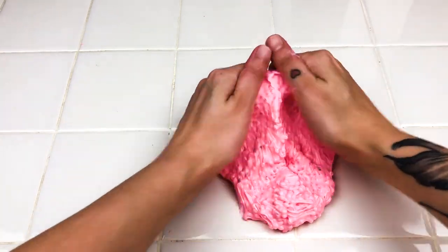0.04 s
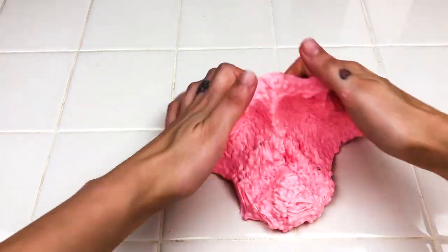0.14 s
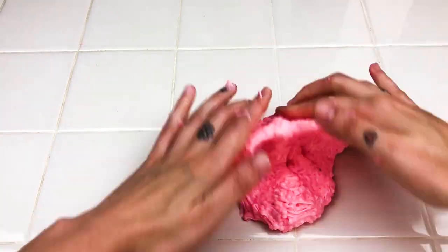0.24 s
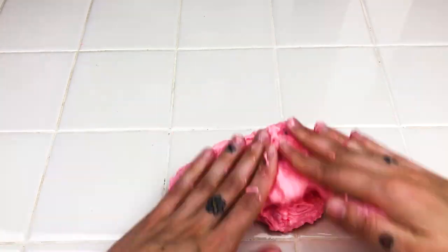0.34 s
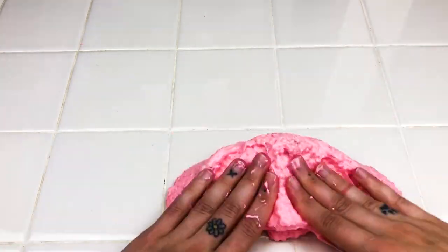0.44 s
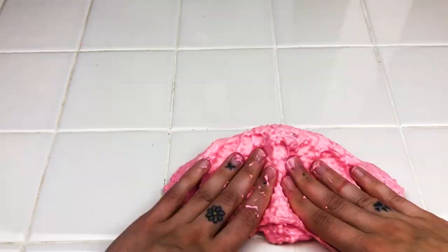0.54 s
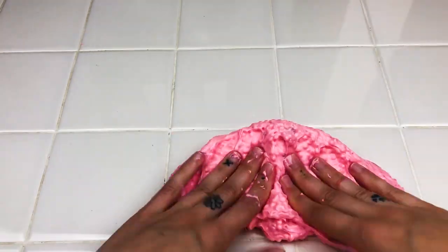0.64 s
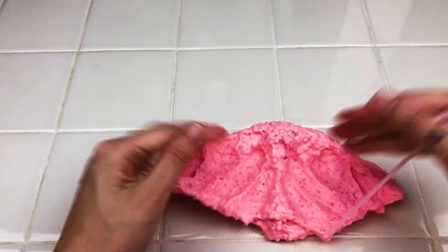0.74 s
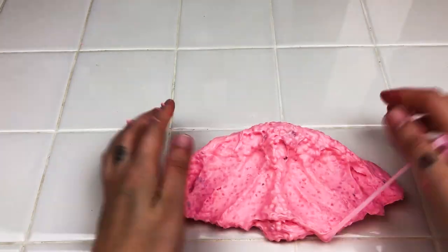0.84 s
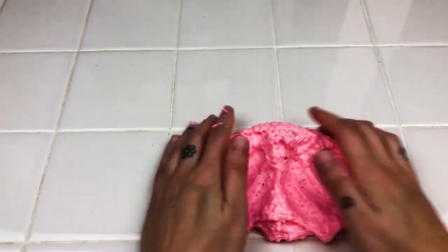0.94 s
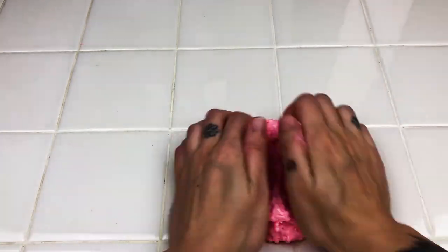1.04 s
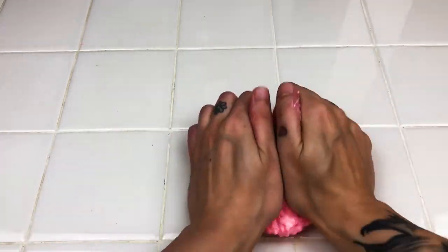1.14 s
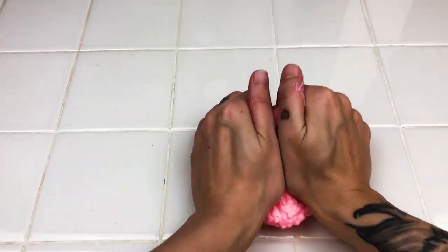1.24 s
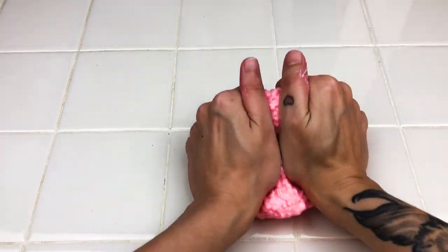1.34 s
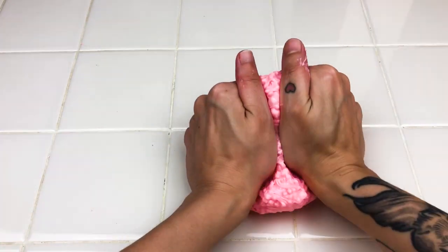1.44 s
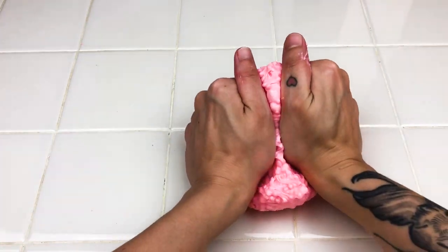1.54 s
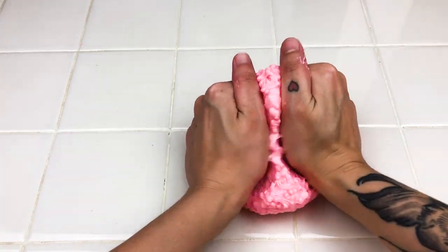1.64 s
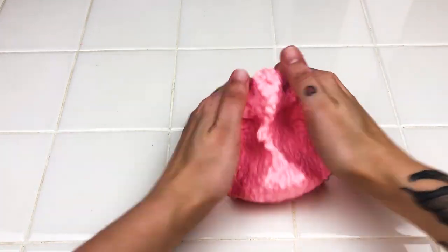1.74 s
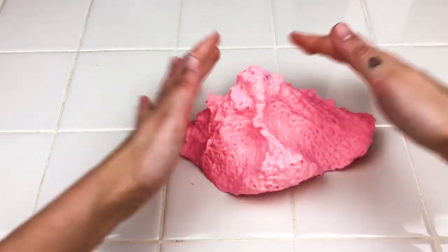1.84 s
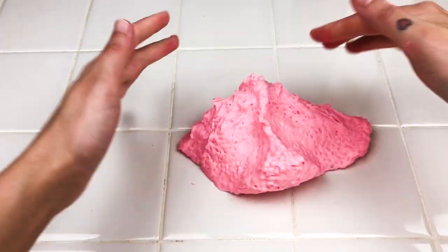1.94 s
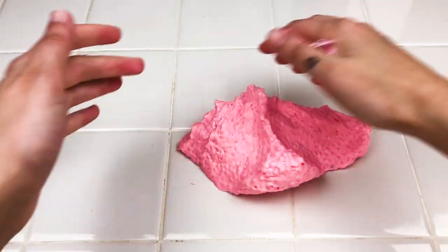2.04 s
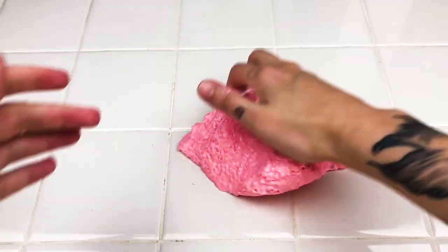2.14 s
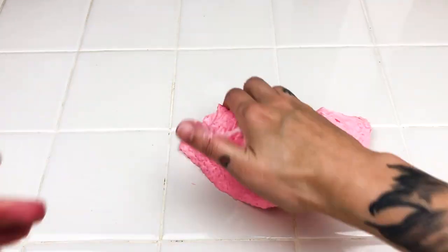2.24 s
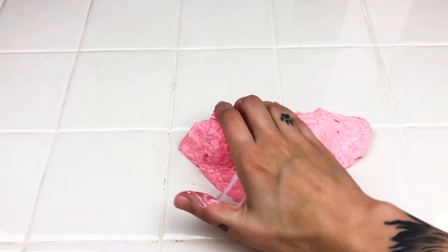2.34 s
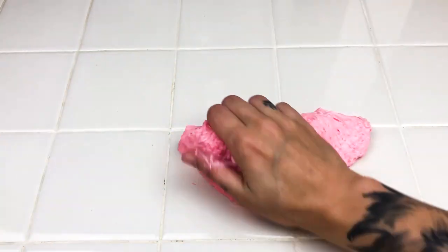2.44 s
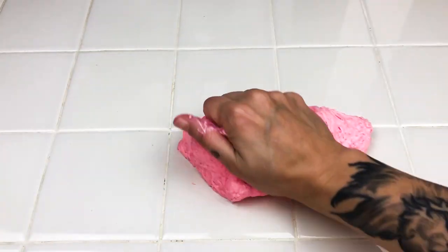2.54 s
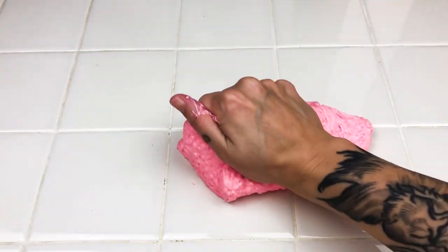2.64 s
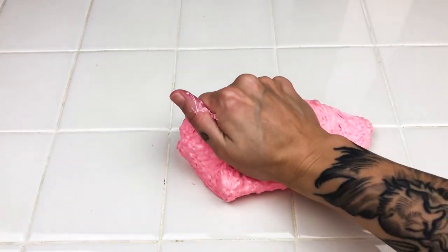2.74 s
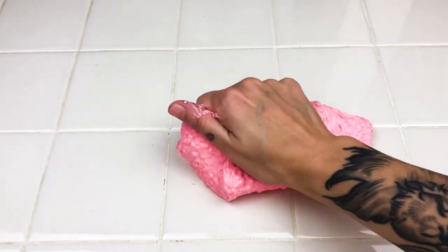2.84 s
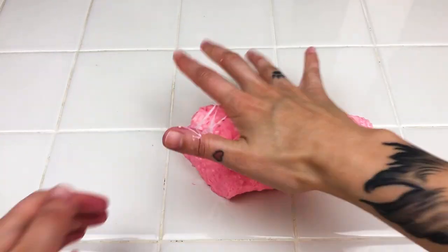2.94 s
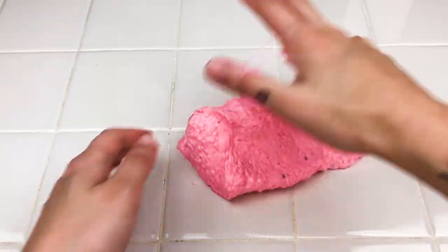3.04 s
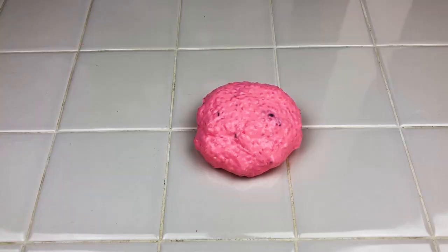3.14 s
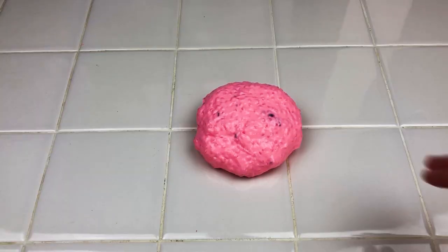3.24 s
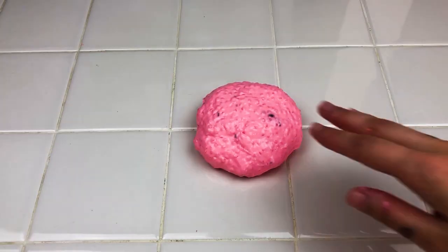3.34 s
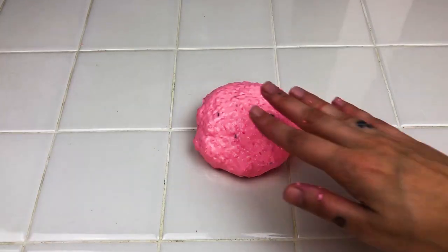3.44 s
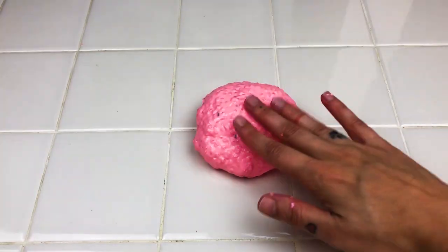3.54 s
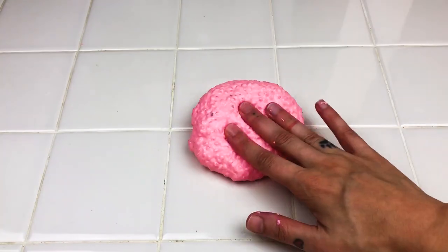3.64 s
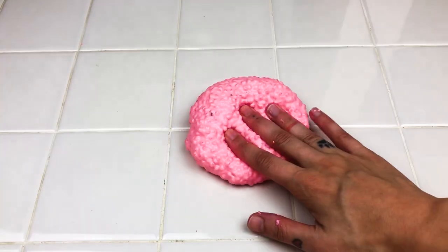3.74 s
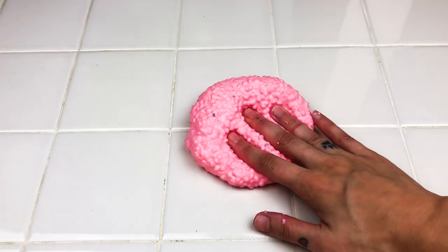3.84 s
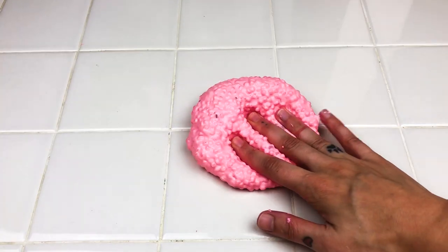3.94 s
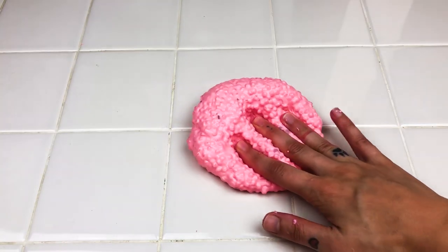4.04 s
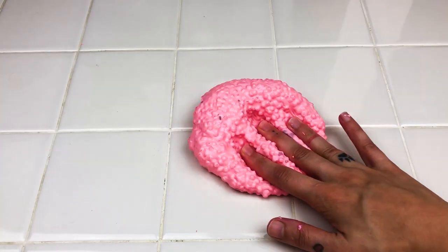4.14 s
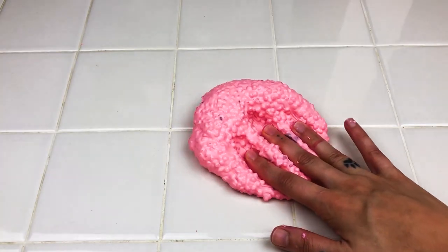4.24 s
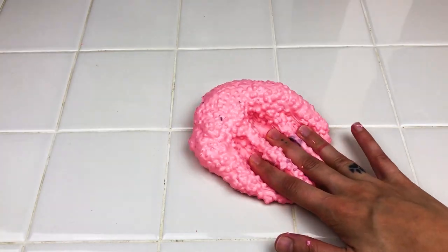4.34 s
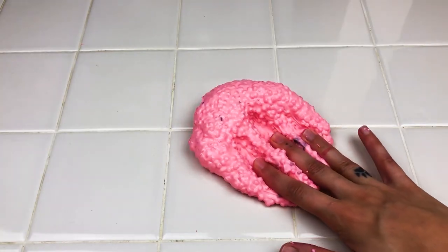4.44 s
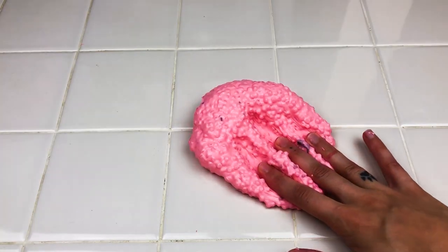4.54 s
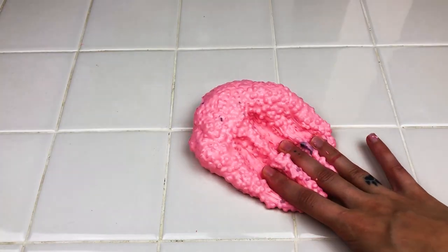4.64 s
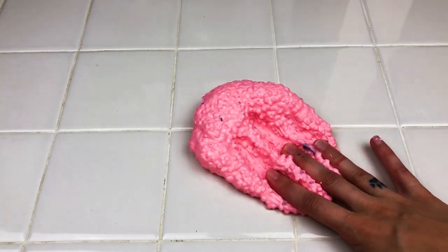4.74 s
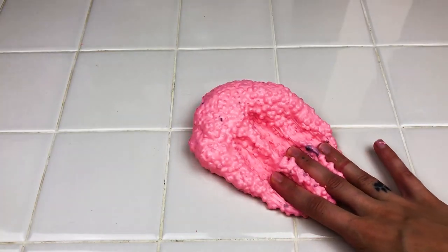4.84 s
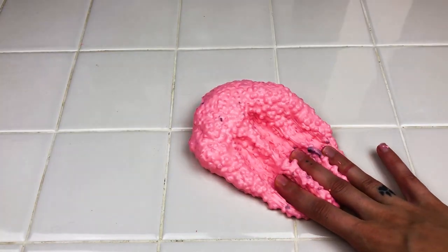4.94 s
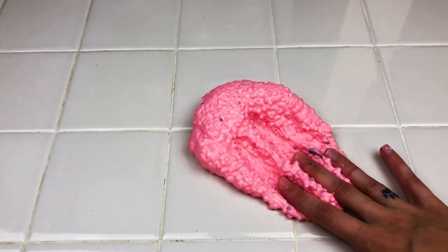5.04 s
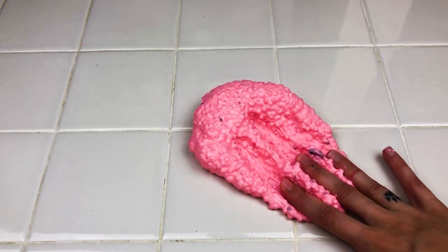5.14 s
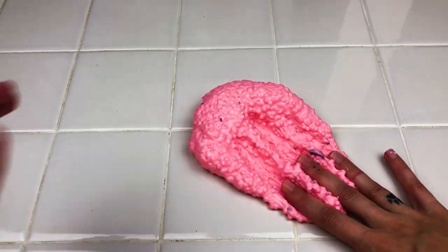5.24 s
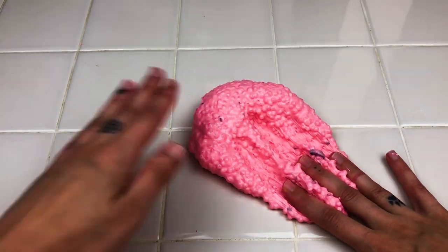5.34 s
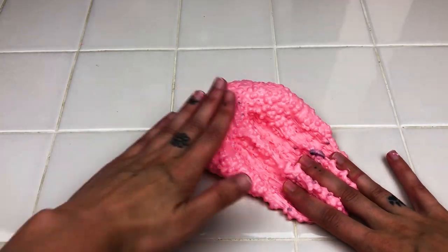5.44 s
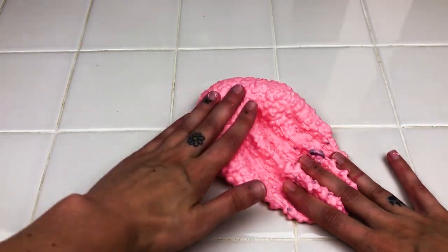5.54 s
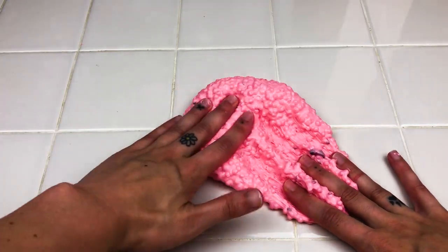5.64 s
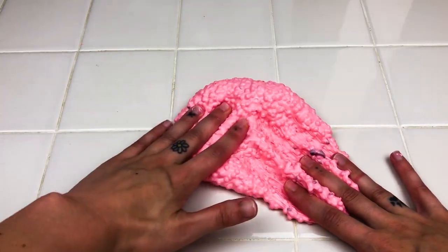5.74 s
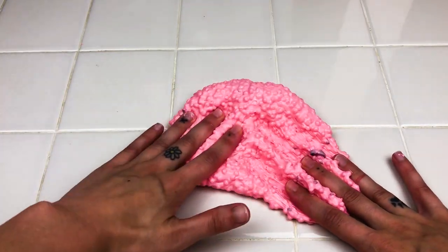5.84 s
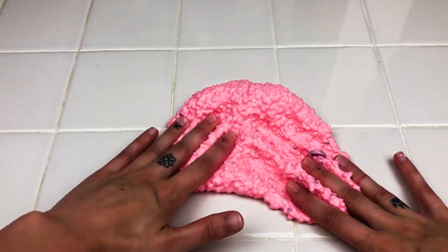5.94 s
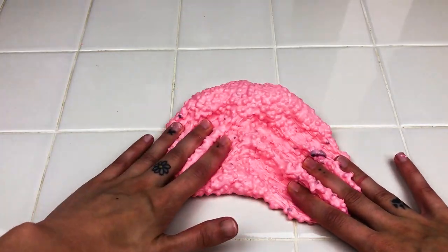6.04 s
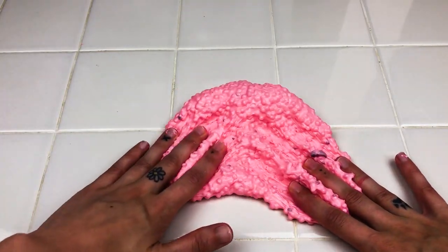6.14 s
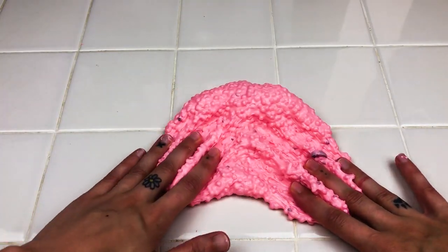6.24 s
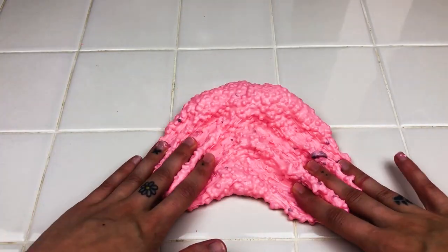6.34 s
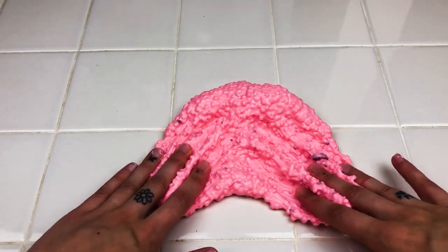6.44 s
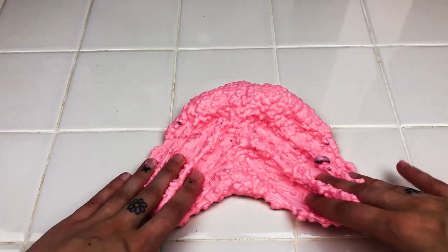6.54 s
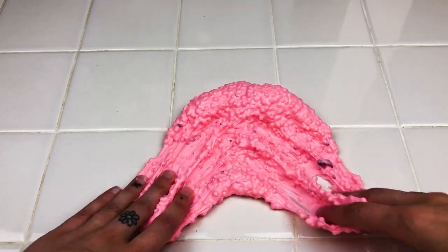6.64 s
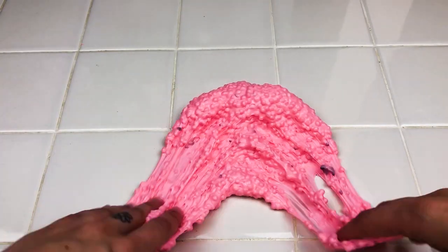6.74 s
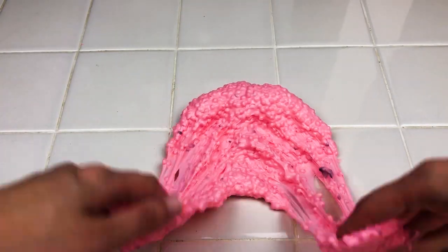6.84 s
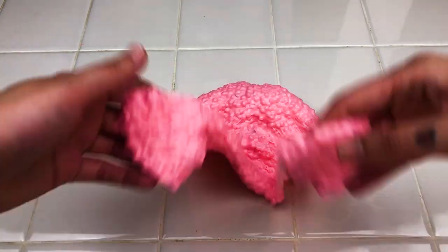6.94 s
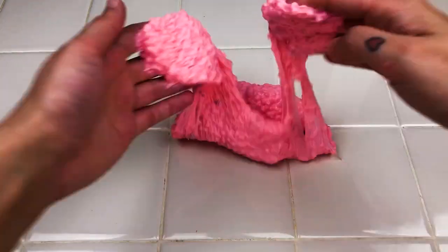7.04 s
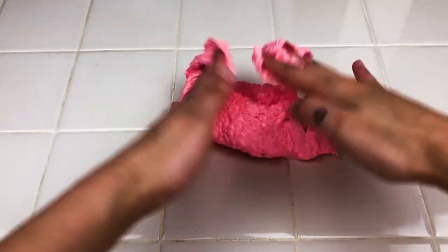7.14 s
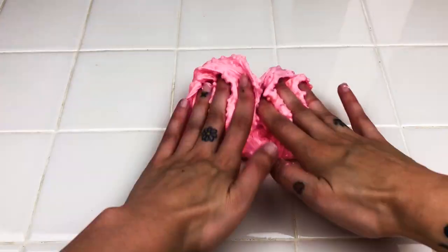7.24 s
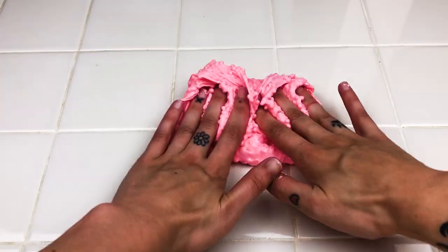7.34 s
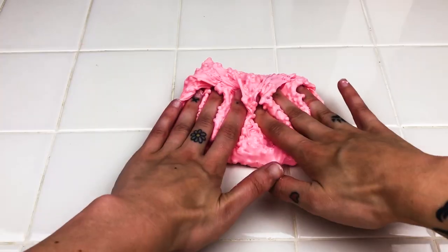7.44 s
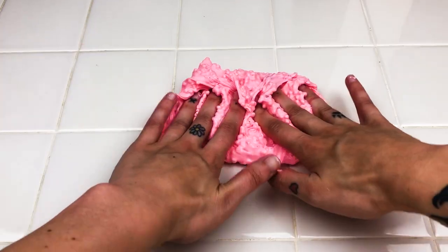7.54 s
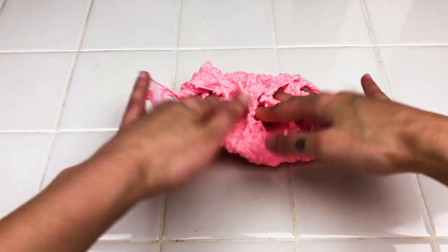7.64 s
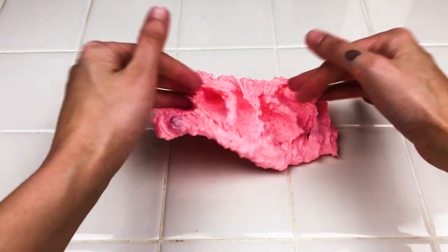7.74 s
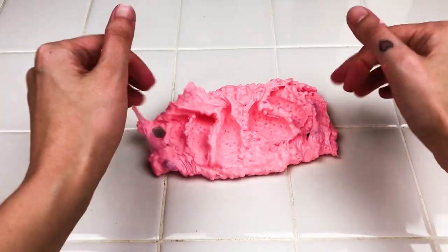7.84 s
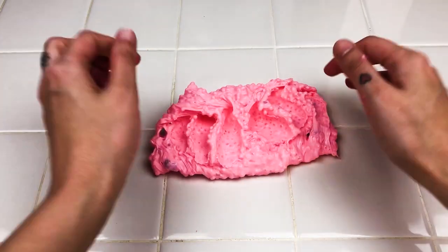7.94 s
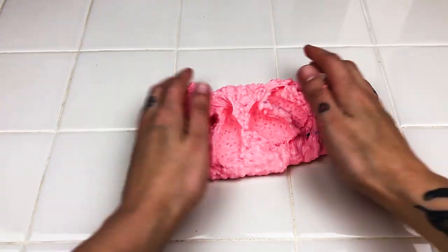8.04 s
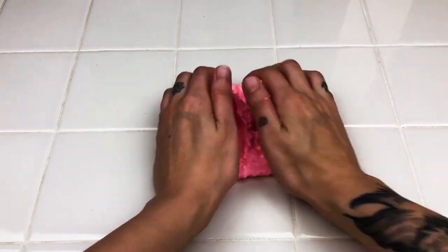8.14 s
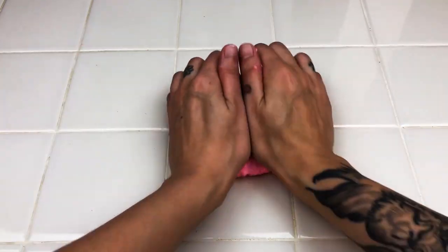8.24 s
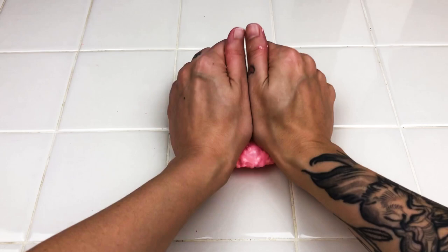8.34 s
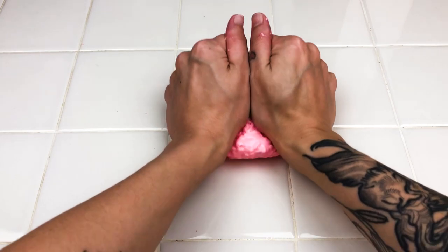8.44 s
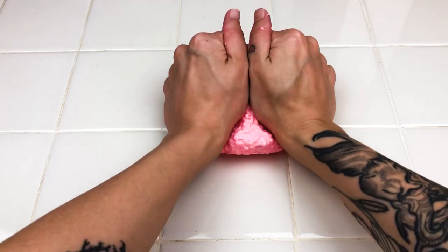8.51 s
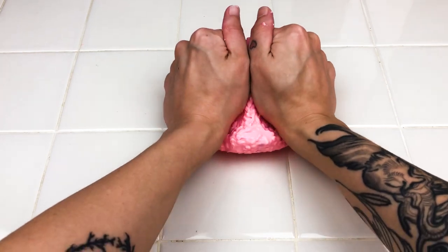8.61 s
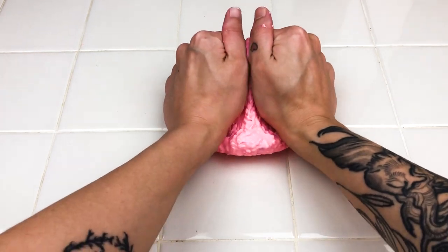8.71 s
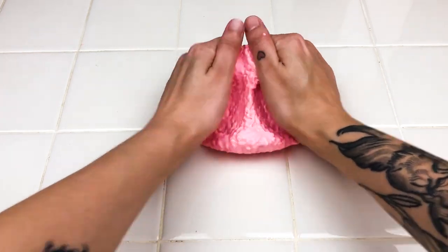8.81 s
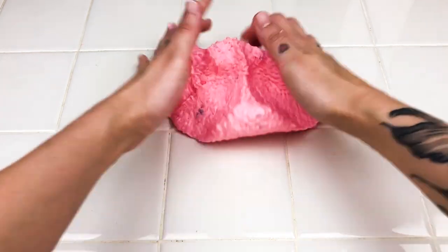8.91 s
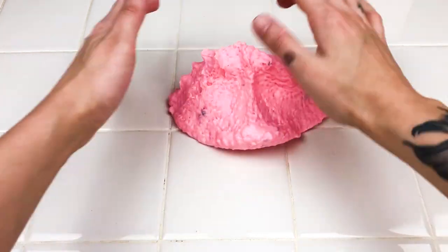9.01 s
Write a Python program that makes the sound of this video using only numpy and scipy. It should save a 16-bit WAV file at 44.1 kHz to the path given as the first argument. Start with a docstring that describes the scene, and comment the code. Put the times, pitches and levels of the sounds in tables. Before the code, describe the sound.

Close, dry sound of foam-bead slime handled on a tiled counter, with very short bright reflections and a faint low appliance hum. From 0 to 0.8 s, squeezes give crunchy crackle, crisp high pops, a strong snap at 0.6 and a wet peel near 0.8. From 1.0 to 1.85 s, pops crowd together over squelchy crackle, ending in a loud peel. A near-quiet gap follows until about 2.4, then another popping squeeze to 2.8 and crackly peels around 2.95. After quiet, 3.7 to 6.3 s is a slow gentle drag: faint fine crackle and scattered ticks. A tight burst of pops comes at 6.4-6.6, softer stretching after, a sharp snap at 7.4 and crunchy peels near 7.7. From 8.2 to 9 s come louder hollow pops, a tiny squeak, the loudest snap at 8.74 and a final wet crunch. Dull palm thumps are barely noticeable.

```python
"""Foam-bead slime, kneaded, folded and stretched by hand on a tiled counter close to a phone.
Air pockets burst as short decaying tones, each with a splatter of weaker neighbours; hollow pockets ring lower.
Swarms of tiny random bursts follow the hand movements: dense crackle, lone ticks, low wet squelch.
A wet slit squeaks (torn harmonic tones) and palms thump the counter (slow low bursts).
Tiles and a small room echo the slime (decaying noise); shaped noise and sines form air, drone and motor hum."""
import sys
import numpy as np
from scipy import signal
from scipy.fft import rfft, irfft, next_fast_len
from scipy.io import wavfile
from scipy.ndimage import uniform_filter1d

SR = 44100
rng = np.random.default_rng(int(sys.argv[2]) if len(sys.argv) > 2 else 0)


def dump(signal):
    """Clip the signal to [-1, 1] and save it as 16-bit WAV at the path in sys.argv[1]."""
    limited = np.clip(np.atleast_2d(signal).T, -1, 1)
    pcm = np.round(limited * 32767).astype(np.int16)
    wavfile.write(sys.argv[1], SR, pcm)


N = 399987
T_S = np.arange(N) / SR

# single bursting pockets: t/s, peak level/dB, f/Hz, spectral spread/octaves, splatter re peak/dB
POPS = [(0.0854, -25, 10320, 0.3, -16), (0.1211, -22, 6630, 0.54, -11), (0.137, -16.5, 11300, 0.29, -20),
        (0.1657, -18, 11530, 0.48, -14), (0.2239, -14, 11250, 0.59, -13), (0.4454, -24, 5570, 0.66, -20),
        (0.4987, -15.5, 3070, 0.56, -22), (0.5262, -25, 2760, 0.95, -9), (0.5351, -24, 5800, 1.29, -9),
        (0.5511, -26, 10370, 0.59, -12), (0.59, -4.5, 10800, 0.38, -18), (0.642, -27.5, 4010, 0.41, -16),
        (0.6549, -30, 10940, 0.59, -18), (0.7205, -25, 10970, 0.43, -8), (0.7408, -24, 6860, 0.3, -7),
        (0.7895, -24, 7840, 0.43, -11), (1.0056, -21.5, 8590, 0.73, -16), (1.0347, -14, 7000, 0.82, -6.5),
        (1.0433, -22, 13620, 0.24, -17), (1.0492, -17.5, 8110, 0.6, -7), (1.054, -22, 8200, 0.57, -13),
        (1.0874, -24, 4750, 0.55, -22), (1.1203, -10.5, 5900, 0.73, -9.5), (1.136, -19, 11020, 0.68, -16),
        (1.151, -7.5, 6000, 0.69, -15), (1.1673, -23, 4630, 0.22, -17), (1.1902, -14, 9430, 0.6, -22),
        (1.1999, -22, 7340, 0.48, -13), (1.202, -22.5, 6500, 0.5, -6), (1.2338, -27, 6140, 1.1, -3),
        (1.2375, -21, 6630, 0.69, -11), (1.2424, -22, 7020, 0.82, -15), (1.2695, -9.5, 8550, 0.62, -20),
        (1.2915, -9.5, 3800, 0.47, -12), (1.2952, -7, 5400, 0.35, -17), (1.3517, -18.5, 7200, 0.55, -9),
        (1.3566, -18, 13340, 0.19, -21), (1.3783, -14, 8400, 0.42, -18), (1.3903, -24, 7940, 0.64, -13),
        (1.413, -7, 7700, 0.48, -25), (1.4216, -20, 8890, 0.73, -13), (1.4307, -14, 10920, 0.63, -15),
        (1.439, -25, 10300, 0.43, -19), (1.4512, -24, 6800, 0.38, -19), (1.4702, -23, 11020, 0.45, -16),
        (1.513, -29, 9870, 0.64, -13), (1.5268, -16.5, 6110, 0.79, -11.5), (1.5656, -24, 3700, 0.44, -12),
        (1.5967, -6.5, 8600, 0.97, -16), (1.5994, -7, 9500, 0.54, -22.5), (1.7284, -21, 10040, 0.77, -10),
        (1.7513, -8.5, 5600, 0.4, -17), (1.7602, -23, 5110, 0.41, -13), (1.779, -16, 9400, 0.63, -15),
        (1.786, -14, 5820, 0.64, -14), (1.796, -16, 6560, 0.61, -7), (1.804, -13, 7810, 1.1, -13),
        (1.8154, -18, 10440, 0.31, -12), (1.8395, -19, 7490, 0.63, -6), (2.2663, -37, 8050, 0.62, -15),
        (2.3883, -34, 9730, 0.56, -12), (2.3918, -33, 10470, 0.37, -19), (2.433, -35, 8520, 0.53, -19),
        (2.4651, -35, 10940, 0.63, -4), (2.4777, -18, 3560, 1.06, -12), (2.5045, -10, 12530, 0.42, -23),
        (2.5251, -14.5, 7160, 0.75, -12), (2.5388, -12, 10540, 0.52, -25), (2.5538, -10, 9600, 0.56, -16),
        (2.565, -16, 8600, 0.68, -16), (2.568, -22, 9590, 0.64, -12), (2.5908, -29.5, 5740, 0.6, -4),
        (2.612, -23, 8650, 0.64, -13), (2.6161, -19, 10080, 0.59, -17), (2.6405, -22, 5970, 0.64, -21),
        (2.6732, -18.5, 7460, 1, -11), (2.7167, -22.5, 5490, 0.69, -9), (2.7222, -18, 8330, 0.87, -14),
        (2.724, -14.5, 8800, 0.4, -28), (2.7526, -22, 9850, 0.37, -15), (2.7578, -24, 7950, 0.47, -22),
        (2.7846, -31, 8170, 0.68, -11), (3.0049, -28, 6080, 0.32, -13), (3.6965, -35, 11780, 0.51, -23),
        (3.7376, -25, 13310, 0.27, -30), (3.76, -30, 12190, 0.53, -17), (3.8653, -35.5, 10540, 0.23, -14),
        (3.8842, -27, 12890, 0.26, -27), (3.9912, -31.5, 12790, 0.44, -24), (4.022, -32.5, 7600, 0.86, -11),
        (4.073, -35.5, 8520, 0.86, -11), (4.1715, -25, 12100, 0.7, -20), (4.177, -26, 12800, 0.32, -30),
        (4.2347, -29, 11620, 0.43, -28), (4.314, -23, 11100, 0.18, -26), (4.3293, -33, 9870, 0.77, -16),
        (4.4177, -27, 12700, 0.25, -29), (4.4822, -20.5, 13400, 0.15, -29), (4.497, -25, 12740, 0.42, -28),
        (4.5405, -26, 10850, 0.53, -27), (4.5631, -34, 11620, 0.4, -21), (4.5843, -24, 11040, 0.24, -33),
        (4.6323, -24.5, 9470, 0.46, -26), (4.7678, -29, 7600, 0.64, -13), (4.7804, -27, 10890, 0.42, -15),
        (5.0523, -36, 9240, 0.81, -23), (5.228, -37, 14730, 0.14, -20), (5.6243, -34.5, 9260, 0.51, -19),
        (5.7148, -18, 10800, 0.56, -23), (5.7575, -35, 10820, 0.42, -23), (5.818, -31, 8300, 0.7, -15),
        (5.8465, -33, 13000, 0.36, -14), (5.9664, -20, 6500, 0.84, -16), (6.0276, -26, 10080, 0.86, -13),
        (6.0408, -34, 9500, 0.94, -14), (6.115, -27, 9910, 0.75, -19), (6.1201, -25.5, 12740, 0.37, -18),
        (6.1886, -21, 12000, 0.27, -14), (6.2086, -33, 13380, 0.2, -24), (6.2476, -30, 7650, 0.3, -20),
        (6.3303, -25.5, 10500, 0.24, -25), (6.3673, -29, 9830, 0.38, -25), (6.3803, -29, 9430, 0.3, -24),
        (6.3942, -17, 7900, 0.46, -24), (6.4212, -26, 11490, 0.41, -20), (6.4459, -28, 9470, 0.49, -22),
        (6.4618, -17, 7660, 0.6, -8.5), (6.4657, -23, 9080, 0.55, -16), (6.4752, -13, 9360, 0.58, -23),
        (6.4922, -24, 6530, 0.25, -11), (6.4963, -20, 9100, 0.58, -22), (6.502, -22, 7100, 0.32, -25),
        (6.5106, -21, 6640, 0.51, -10), (6.5197, -10.5, 9450, 0.64, -25), (6.5254, -23, 8000, 0.48, -4),
        (6.5283, -11, 8600, 0.46, -25), (6.5425, -13, 8100, 0.75, -12), (6.5546, -22, 10110, 0.47, -24),
        (6.5583, -26, 7680, 0.6, -18), (6.5833, -18.5, 6870, 0.64, -23), (6.6476, -29, 4800, 0.27, -30),
        (6.6482, -31, 9300, 0.27, -30), (6.6584, -28, 6530, 0.54, -14), (6.8266, -32, 8430, 0.53, -17),
        (6.9025, -31, 9360, 0.61, -13), (6.9746, -23, 4970, 0.97, -22), (7.0051, -33, 6560, 0.56, -17),
        (7.0311, -15, 11840, 0.59, -25), (7.0502, -34, 10710, 0.62, -17), (7.0669, -29, 11170, 0.28, -25),
        (7.109, -34, 11320, 0.37, -23), (7.263, -36, 13050, 0.37, -11), (7.3724, -27.5, 8100, 0.48, -7),
        (7.3991, -26, 8280, 0.44, -17), (7.4244, -4, 12800, 0.49, -25), (7.4571, -31, 6550, 0.38, -17),
        (7.4774, -22, 8170, 0.99, -15), (7.486, -28, 9680, 0.41, -19), (7.586, -36, 12670, 0.22, -25),
        (7.67, -26, 9760, 0.52, -8), (7.675, -22, 8610, 0.57, -12), (7.7014, -15.5, 8000, 0.48, -8.5),
        (7.735, -7, 10600, 0.26, -24), (7.7996, -17, 11020, 0.37, -18), (7.9132, -29.5, 5030, 1.1, 0),
        (7.9172, -15.5, 9760, 0.28, -25), (7.933, -17, 8800, 0.33, -21), (8.1682, -27.5, 4400, 0.38, -18),
        (8.1727, -29, 8070, 0.39, -13), (8.1985, -34, 11660, 0.52, -13), (8.2228, -31, 7530, 0.69, -7),
        (8.2399, -19.5, 9760, 0.48, -16), (8.2718, -14, 1950, 0.45, -15), (8.3082, -13, 9260, 0.36, -11),
        (8.353, -4, 2880, 0.48, -28), (8.4707, -15, 10160, 0.3, -17), (8.5023, -9.5, 9560, 0.45, -13),
        (8.5244, -16, 7910, 0.87, -8.5), (8.553, -22.5, 4160, 1, -12), (8.593, -18.5, 12040, 0.27, -19),
        (8.6044, -19, 9440, 0.65, -13), (8.6442, -15.5, 12630, 0.31, -25), (8.6971, -13, 4650, 0.67, -15.5),
        (8.737, 1.5, 10600, 0.4, -32), (8.8718, -24, 6560, 1.2, -13), (8.9055, -9, 5940, 1.17, -8),
        (8.927, -16.5, 9450, 0.34, -11)]
# larger hollow pockets: t/s, peak level/dB, f/Hz, swell time/cycles
HOLLOWS = [(0.445, -33.5, 2020, 1), (0.497, -26, 1340, 0.63), (0.526, -26, 1270, 0.67),
           (1.086, -32, 2210, 0.65), (1.121, -25, 2850, 0.53), (1.29, -20.5, 2300, 0.8),
           (1.563, -33, 1640, 0.8), (1.596, -27, 1290, 0.76), (2.274, -42.5, 1280, 0.8),
           (2.478, -29, 2300, 0.8), (2.673, -31, 1150, 0.65), (2.721, -30, 1400, 0.74),
           (4.732, -47, 827, 0.73), (6.935, -42, 1800, 0.9), (6.973, -38, 1610, 0.9),
           (7.424, -35, 1830, 0.58), (7.476, -36.5, 1170, 0.57), (7.911, -35.5, 2490, 0.99),
           (8.271, -12, 1520, 0.89), (8.33, -26, 2340, 0.65), (8.353, -18, 2770, 0.52),
           (8.553, -36.5, 844, 0.74), (8.673, -36, 2700, 0.8), (8.696, -22.5, 2650, 0.75),
           (8.871, -34, 1300, 0.8), (8.905, -27, 1310, 0.73)]
# hand movements (squeeze, drag or peel): full from t/s, full until t/s, rise/(s per 20 dB),
# fall/(s per 20 dB), nominal crackle level/dB, nominal squelch level/dB, crackle pitch shift/octaves
STROKES = [(0.0, 0.02, .05, .11, -45, -55, .4), (0.115, 0.15, .11, .21, -39, -45, -.25),
           (0.445, 0.47, .05, .11, -62, -59, -.9), (0.51, 0.52, .055, .14, -50, -54, -.45),
           (0.6, 0.65, .06, .05, -57, -54, -.1), (0.755, 0.77, .042, .05, -32, -42, .4),
           (1.04, 1.07, .04, .09, -45, -53, -.1), (1.15, 1.17, .09, .25, -46, -50, -.6),
           (1.297, 1.31, .05, .11, -41, -58, -.75), (1.36, 1.44, .11, .13, -47, -52, -.3),
           (1.5, 1.58, .09, .08, -50, -57, -.7), (1.6, 1.606, .025, .12, -42, -48, .05),
           (1.75, 1.78, .085, .11, -41, -46, -.3), (1.825, 1.83, .08, .08, -29, -39, .45),
           (2.285, 2.3, .09, .11, -59, -58, -.2), (2.51, 2.58, .065, .2, -46, -52, -.2),
           (2.722, 2.73, .03, .09, -47, -50, -.52), (2.92, 2.94, .012, .11, -41, -46, -.1),
           (2.952, 2.965, .05, .06, -37, -41, .33), (3.04, 3.048, .11, .032, -45, -50, .15),
           (3.74, 3.76, .13, .35, -65, -69, .52), (4.15, 4.6, .52, .4, -71, -71, .1),
           (4.62, 4.79, .11, .3, -67, -68, -.75), (5.24, 5.25, .2, .4, -71, -76, -.2),
           (5.58, 6.37, .08, .11, -67, -70, .05), (6.39, 6.395, .03, .08, -51, -55, .05),
           (6.465, 6.54, .025, .12, -47, -61, -.05), (6.61, 6.67, .11, .2, -57, -72, -.5),
           (6.72, 6.95, .11, .11, -64, -72, -.42), (6.97, 6.985, .08, .03, -55, -59, .4),
           (7.04, 7.045, .035, .13, -52, -63, .2), (7.27, 7.28, .06, .2, -58, -70, .3),
           (7.37, 7.5, .05, .16, -56, -62, -.35), (7.68, 7.705, .025, .06, -39, -43, .4),
           (7.728, 7.736, .055, .085, -34, -41, -.1), (7.78, 7.797, .06, .05, -48, -52, .05),
           (7.92, 7.927, .025, .07, -47, -56, -.15), (8.17, 8.26, .06, .11, -56, -60, -.7),
           (8.33, 8.37, .14, .11, -47, -54, -.8), (8.42, 8.6, .06, .06, -51, -58, -1.1),
           (8.468, 8.476, .055, .14, -35, -51, .9), (8.6, 8.61, .08, .04, -43, -54, .35),
           (8.64, 8.72, .11, .11, -56, -54, -.6), (8.742, 8.748, .025, .085, -43, -54, .3),
           (8.915, 8.93, .095, .12, -32, -40, .2), (8.99, 9.01, .08, .05, -40, -50, .6)]
# air forced through a narrow wet slit: t/s, length/s, level/dB, start f/Hz, end f/Hz, breathiness/0-1
SQUEAKS = [(8.461, 0.032, -28.5, 10700, 10560, .9), (8.608, 0.0098, -32, 2860, 2530, 0.25),
           (8.616, 0.0098, -48, 2650, 2600, .1), (8.668, 0.016, -41, 2580, 2790, .1)]
# hands landing on the counter: t/s, peak level/dB, f/Hz
THUMPS = [(0.059, -45, 56.5), (1.068, -48, 70.0), (1.717, -39, 75.4), (1.865, -44, 64.6),
          (3.072, -51, 59.2), (7.015, -50, 108), (7.726, -56, 109), (7.917, -45, 69.6), (8.131, -51, 78.1),
          (8.243, -46, 64), (8.362, -57, 94.2), (8.845, -48, 70.0)]
# air noise spectrum, relative: f/Hz, density/(dB per Hz)
AIR_SPECTRUM = [(30, -35.5), (55, -17.5), (85, -22), (140, -12), (250, -4.5), (320, -12.5), (500, -13),
                (800, -21), (1000, -22.5), (2000, -34.5), (4000, -36.5), (7000, -45), (16000, -48.5)]
# appliance drone in the room's low modes: f/Hz, half-amplitude width/Hz, rms level/dB
DRONE_MODES = [(109, 23, -62), (159.7, 14, -62.5), (196.5, 14, -63), (222.6, 35, -59.5), (366.3, 47, -59),
               (431.8, 12, -68.5)]
# appliance motor tones: f/Hz, rms level/dB
MOTOR_TONES = [(59.3, -65.5), (118.4, -64.5)]

CRACKLE_CENTRE_HZ, SQUELCH_CENTRE_HZ = 7000, 1100
# slime settling round a burst pocket: crackle and squelch re the pop's peak, decay time
SETTLE_CRACKLE_DB, SETTLE_SQUELCH_DB, SETTLE_T60_S = -42, -52, .12
# creep after a movement: level re the movement, s per 20 dB of fall, pitch shift
CREEP_DB, CREEP_S_PER_20DB, CREEP_OCT = -23, .21, -1.3
GIVE_DB, GIVE_PER_S = 1.6, 30  # the slime yields in fits and starts: spread and rate of random levels
FINE_DB = -1.3  # dense crackle re the crackle level
# lone ticks: level in a gentle drag, the drag's crackle level, exponent on louder movement
TICKS_DB, DRAG_DB, TICKS_FOLLOW = -73, -70, .8
AIR_DB = -54.5
TILES_DB, TILES_T60_S = -29.5, .035
ROOM_DB, ROOM_T60_S, ROOM_TREBLE_T60_S = -42.0, 0.23, 0.19
TOP_HZ = 15950


def undb(db):
    """Amplitude ratio of a level in dB."""
    return 10 ** (np.asarray(db) / 20)


def level(x, rms_db):
    """Scale x to an rms level."""
    return x * undb(rms_db) / np.sqrt(np.mean(x ** 2))


def fade(t_s, t60_s):
    """Exponential decay, -60 dB at t60_s."""
    return np.exp(-np.log(1000) * t_s / t60_s)


def bursts(start_s, db, hz, cycles, glide, size=256):
    """Small cavities opening: a smooth swell peaks after `cycles` periods and decays as the pitch glides."""
    start = (start_s * SR).astype(int)
    t_s = np.maximum(np.arange(size) / SR - (start_s - start / SR)[:, None], 0)
    u = 2 * t_s * (hz / cycles)[:, None]
    swell = (np.e * u / 2) ** 2 * np.exp(-u)
    start_turns = rng.random((len(start_s), 1))
    turns = hz[:, None] * t_s * (1 + glide * np.tanh(u / 8)) + start_turns
    wave = swell * np.cos(2 * np.pi * turns)
    # air pushed out is drawn back in: no net flow
    wave -= swell * wave.sum(axis=1, keepdims=True) / swell.sum(axis=1, keepdims=True)
    taper = np.hanning(2 * size)[size:]
    out = np.zeros(N + size)
    np.add.at(out, start[:, None] + np.arange(size), wave * undb(db)[:, None] * taper)
    return out[:N]


def swarm(per_s, scatter_db, centre_hz, spread_oct, cycles, size):
    """Many cavities bursting at random, a few much louder than the rest; rms 1."""
    when, tune, loud, ring = rng.random((int(per_s * N / SR), 4)).T
    start_s = np.sort(when) * (N - 1) / SR
    centre = np.interp(start_s, T_S, centre_hz)
    hz = np.clip(centre * 2 ** (spread_oct * (2 * tune - 1)), 300, 15800)
    # small pockets ring briefly, so they start a little stronger
    db = 2.4 * np.log2(hz / centre) - scatter_db * np.log(1 - .995 * loud)
    return level(bursts(start_s, db, hz, cycles * (.5 + ring), 0.15, size=size), 0)


def pops(neighbours=14):
    """Bursting pockets: a narrow spectrum means longer ringing; neighbours give way milliseconds later."""
    start_s, db, hz, spread_oct, splatter_db = np.transpose(POPS)
    cycles = np.clip(0.19 / np.maximum(spread_oct - .05, .1), .12, 3)
    direct = bursts(start_s, db, hz, cycles, 0.022)

    chance = rng.random((len(start_s), neighbours, 3))
    wait_s = 0.000302 + .006 * chance[..., 0] ** 1.5
    near_oct = 1.88 * spread_oct[:, None] * (2 * chance[..., 1] - 1)
    near_hz = np.clip(hz[:, None] * 2 ** near_oct, 500, 15000)
    # later neighbours are weaker, by 0.9 dB per ms
    near_db = (db + splatter_db)[:, None] + 6.0 * (1 - 2 * chance[..., 2]) - 900 * wait_s
    near_s = start_s[:, None] + wait_s
    near_cycles = np.repeat(1.53 * cycles, neighbours)
    splatter = bursts(near_s.ravel(), near_db.ravel(), near_hz.ravel(), near_cycles, .05, size=128)

    # the tile under each pocket returns it a moment later, notching its spectrum
    bounce_s = .00012 + 0.000307 * rng.random(len(start_s))
    bounce = bursts(start_s + bounce_s, db - 6.0, hz, cycles, .03)
    return direct + bounce + splatter


def hollows():
    """Low hollow pockets, ringing just after the listed time; pitch sags as the walls relax."""
    start_s, db, hz, cycles = np.transpose(HOLLOWS)
    return bursts(start_s + 0.000886, db, hz, np.clip(cycles, .3, 4), -0.027, size=512)


def settling(values):
    """Slime settling after pops: each pop's value is left as a power that dies away."""
    kicks = np.zeros(N)
    np.add.at(kicks, (np.transpose(POPS)[0] * SR).astype(int), values)
    power_decay = fade(2 / SR, SETTLE_T60_S)
    return signal.lfilter([1], [1, -power_decay], kicks)


def kneading():
    """Tiny pockets crackle between the beads; larger wet ones smack lower as skin peels away."""
    t_s = T_S[::64]
    start, end, rise, fall, crackle_db, squelch_db, shift_oct = np.transpose(STROKES)[:, :, None]
    away_db = -20 * (np.maximum(start - t_s, 0) / rise + np.maximum(t_s - end, 0) / fall)
    stroke = undb(away_db) ** 2
    # the lump keeps creeping after each movement
    creep = undb(CREEP_DB - 20 * (t_s - end) / CREEP_S_PER_20DB) ** 2 * (t_s > end)

    def summed(db, stroke_weight, creep_weight=1):
        """Total weighted power of strokes and creep."""
        power = undb(db) ** 2 * (stroke * stroke_weight + creep * creep_weight)
        return np.interp(T_S, t_s, np.sum(power, axis=0))

    _, pop_db, pop_hz, _, _ = np.transpose(POPS)
    pop_power = undb(pop_db) ** 2
    pop_oct = np.log2(pop_hz / CRACKLE_CENTRE_HZ)
    settle_gain = undb(SETTLE_CRACKLE_DB) ** 2
    settled = settling(pop_power)
    crackle_power = summed(crackle_db, 1) + settle_gain * settled + 1e-18
    squelch_power = summed(squelch_db, 1) + undb(SETTLE_SQUELCH_DB) ** 2 * settled
    # power-weighted mean: the loudest cause dominates the crackle's pitch
    weighted_oct = summed(crackle_db, shift_oct, CREEP_OCT) + settle_gain * settling(pop_power * pop_oct)
    octaves = weighted_oct / crackle_power

    knots_s = np.arange(0, T_S[-1] + 1, 1 / GIVE_PER_S)
    crackle_give, squelch_give = [undb(GIVE_DB * np.interp(T_S, knots_s, r))
                                  for r in rng.standard_normal((2, len(knots_s)))]

    crackle_hz = CRACKLE_CENTRE_HZ * 2 ** np.clip(octaves, -1.5, 1)
    crackle = swarm(4000, 3.15, crackle_hz, 1.317, .45, size=80) * undb(FINE_DB)
    crackle = crackle * np.sqrt(crackle_power) * crackle_give

    ticks_hz = 1.15 * CRACKLE_CENTRE_HZ * 2 ** np.clip(octaves, -1.5, .6)
    ticks = swarm(170, 2.8, ticks_hz, .8, .4, size=80)
    ticks = ticks * undb(TICKS_DB) * (np.sqrt(crackle_power) / undb(DRAG_DB)) ** TICKS_FOLLOW

    squelch = swarm(2200, 2.5, np.full(N, SQUELCH_CENTRE_HZ), 1.15, 0.63, size=320)
    squelch = squelch * np.sqrt(squelch_power) * squelch_give
    return ticks + crackle + squelch


def squeaks():
    """Slit lips flutter: a tone with up to two overtones, torn up by turbulence when breathy."""
    out = np.zeros(N)
    for start_s, length_s, db, hz0, hz1, breathy in SQUEAKS:
        u = np.arange(int(length_s * SR)) / (length_s * SR)
        phase = 2 * np.pi * np.cumsum(hz0 + (hz1 - hz0) * np.sqrt(u)) / SR
        tone = sum(undb(-9.0 * k) * np.sin((k + 1) * phase) for k in range(3) if (k + 1) * hz0 < TOP_HZ)
        gusts = uniform_filter1d(rng.standard_normal(4096), size=24)[:len(u)] * 5
        envelope = undb(db) * np.sin(np.pi * u) ** .6
        out[int(start_s * SR):][:len(u)] += envelope * (1 - breathy + breathy * gusts) * tone
    return out


def thumps():
    """The counter answers a landing palm with a dull low knock."""
    start_s, db, hz = np.transpose(THUMPS)
    return bursts(start_s, db, hz, np.full(len(start_s), 1.2), 0., size=4096)


def echoes(x):
    """Dense quick tile reflections, then the room's tail, shorter in the treble."""
    t_s = np.arange(SR // 2) / SR
    near, far = rng.standard_normal((2, len(t_s)))
    bass = signal.sosfilt(signal.butter(2, 3000, fs=SR, output="sos"), far)
    tail = bass * fade(t_s, ROOM_T60_S) + (far - bass) * fade(t_s, ROOM_TREBLE_T60_S)
    tiles = undb(TILES_DB) * near * fade(t_s, TILES_T60_S) * np.clip(t_s / 0.00098, 0, 1)
    room = undb(ROOM_DB) * tail * np.clip(t_s / 0.012, 0, 1)
    return x + signal.fftconvolve(x, tiles + room)[:N]


def coloured(gain_at):
    """Noise whose amplitude at each frequency is gain_at(Hz)."""
    size = next_fast_len(N)
    hz = np.arange(1, size // 2 + 2) * SR / size
    return irfft(rfft(rng.standard_normal(size)) * gain_at(hz), size)[:N]


def room_tone():
    """Broad air noise, an appliance drone gathered in the room's low modes, and its motor tones."""
    air_hz, air_db = np.transpose(AIR_SPECTRUM)
    air = coloured(lambda f: undb(np.interp(np.log(f), np.log(air_hz), air_db, left=-60)))
    drone = sum(level(coloured(lambda f: 1 / (1 + (2 * (f - hz) / width_hz) ** 2)), db)
                for hz, width_hz, db in DRONE_MODES)
    motor = sum(level(np.sin(2 * np.pi * (hz * T_S + rng.random())), db) for hz, db in MOTOR_TONES)
    return level(air, AIR_DB) + drone + motor


def scene():
    """Echoed slime sounds, plus thumps and room tone without added echo."""
    slime = pops() + hollows() + kneading() + squeaks()
    return (echoes(slime) + thumps() + room_tone())[None]


def record(dry):
    """The phone cuts the top: steep low-pass."""
    return signal.sosfilt(signal.ellip(10, .2, 60, TOP_HZ, fs=SR, output="sos"), dry)


dry = scene()
out = record(dry)
dump(out)
```